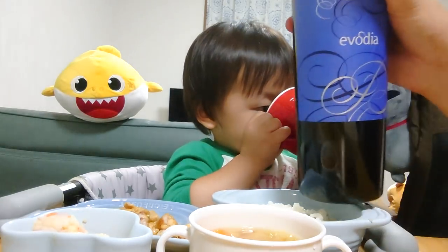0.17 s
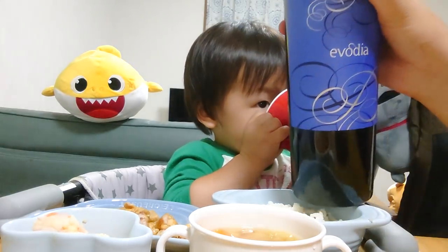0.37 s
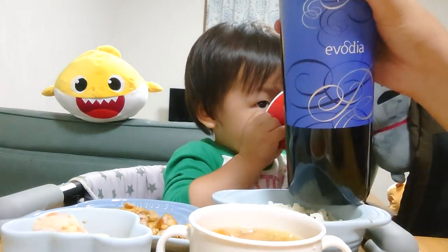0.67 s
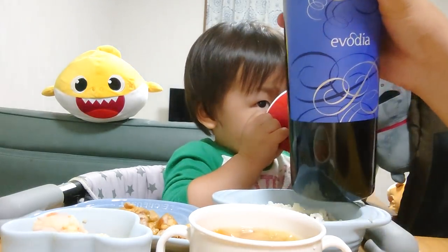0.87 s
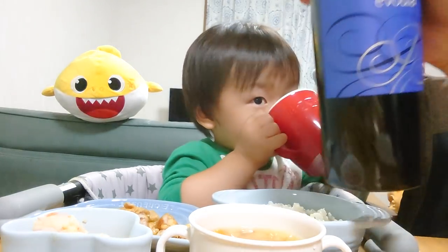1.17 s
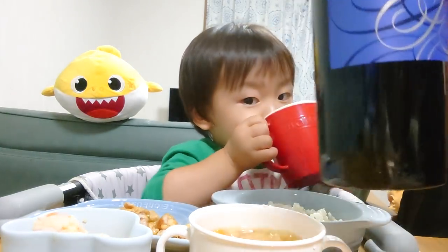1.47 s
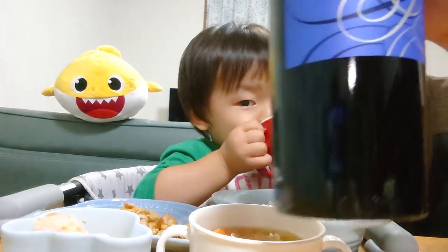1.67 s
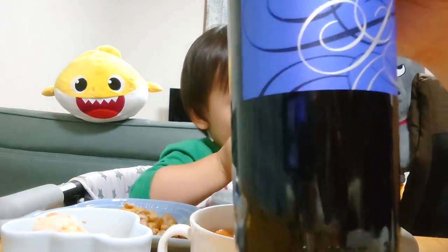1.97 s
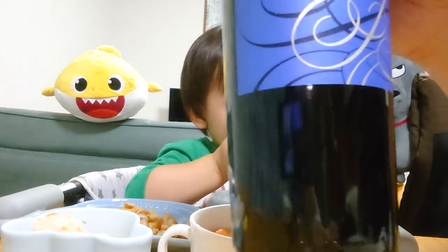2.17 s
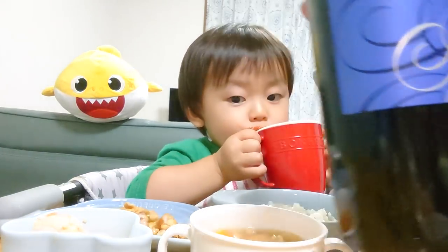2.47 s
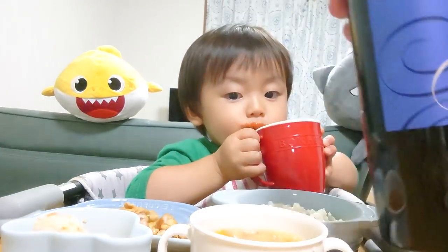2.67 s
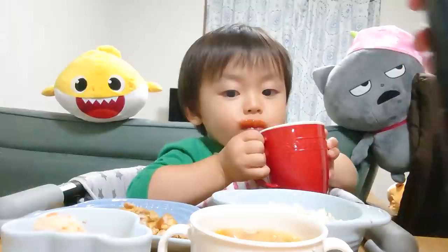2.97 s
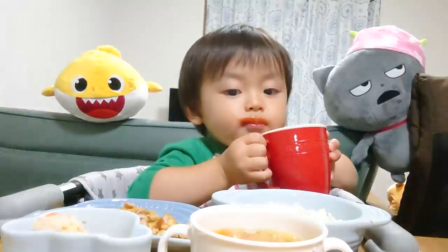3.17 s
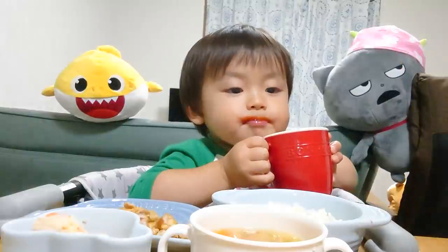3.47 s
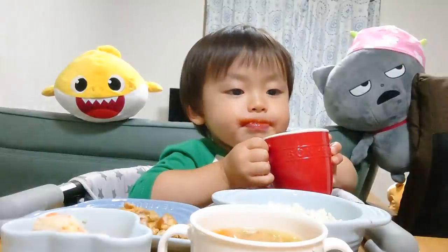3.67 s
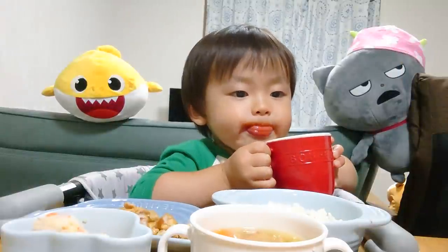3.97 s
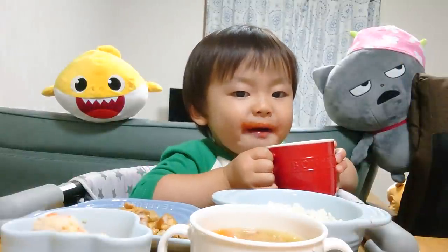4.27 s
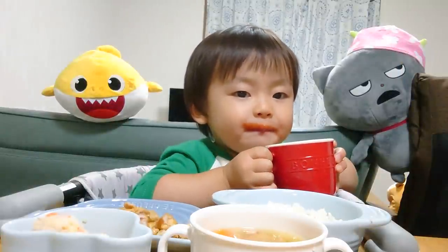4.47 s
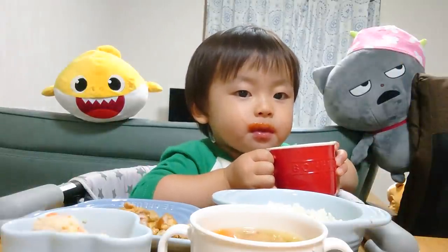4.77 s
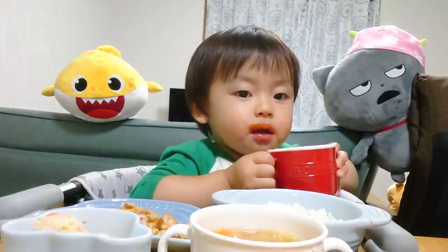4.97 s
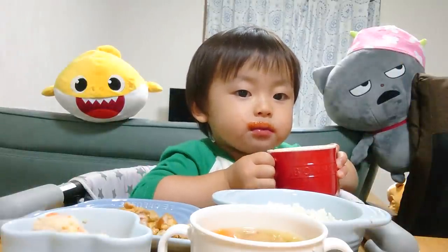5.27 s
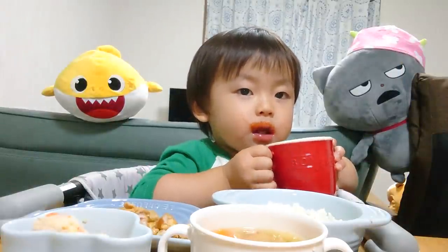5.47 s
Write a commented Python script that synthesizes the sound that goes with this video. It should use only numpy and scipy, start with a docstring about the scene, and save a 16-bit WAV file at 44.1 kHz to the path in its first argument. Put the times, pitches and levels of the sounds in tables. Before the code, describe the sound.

A quiet small dining room at home, heard through a close stereo microphone pair. A low steady hum with a very faint high whine lies to the left, and a thin airy hiss swells about every 0.4 seconds, weaker after 2.7. At 0.16 there is a soft low bump of handling. At 0.7 a glass bottle clacks against a dish, short and bright, just after a tiny creak. Between 1.35 and 1.6 come several faint squeaky creaks. At 2.12 the bottle lands with a woody knock, followed at 2.2 by a sharper, damped glassy one, with small rocking touches and a dull bump until about 2.45. Then mostly hum, a barely audible brush at 3.8 and faint dry ticks at 4.36 and 5.07. At 5.22 a heavy, loud knock shakes the table; dishes rattle briefly, with weaker rebounds to 5.32 and a last low bump at 5.45.

```python
"""A low room hum and a thin, swelling hiss are heard first, made of shaped noise and sines.
A glass bottle is moved about a laid table in a small room, close to a stereo pair of microphone ports.
It clacks against a dish and lands in two knocks; later a heavy knock makes the tableware rattle.
Struck objects are sums of decaying modes, brushing is a run of slips, and creaks are swelling sines."""
import sys
import numpy as np
from scipy import signal
from scipy.fft import rfft, irfft
from scipy.io import wavfile

SR = 44100
rng = np.random.default_rng(int(sys.argv[2]) if len(sys.argv) > 2 else 0)


def unload_audio(sound):
    """Save the sound as a 16-bit wav file, at the path given as the first command line argument."""
    columns = np.transpose(np.atleast_2d(sound))
    # keep every value between -1 and 1, then stretch to whole-number steps
    steps = np.round(np.clip(columns, -1, 1) * 32767)
    wavfile.write(sys.argv[1], SR, steps.astype(np.int16))


N = 247753
TIME = np.arange(N) / SR  # seconds

# Source levels are taken before the ports, the room and the final gains, unless stated otherwise.
# Spectrum of the room tone. Each row: frequency in Hz, relative density in dB per Hz.
ROOM_TONE = [(20, -34), (43, -6.5), (70, -14), (100, -12.5), (150, -2.5), (190, -9.5), (320, -11),
             (520, -16), (680, -15.5), (1150, -24), (2600, -28), (4700, -39.5), (5600, -65.5),
             (16000, -78.5)]
ROOM_TONE_DB = -56  # rms, before its split into diffuse and direct parts
# Steady appliance hum. Each row: frequency in Hz, level at the left port in dB rms.
HUM = [(97, -65), (151, -64), (333.8, -68.5), (429, -74.5), (667.5, -68), (1933, -73.5)]
# Faint wavering appliance whine. Each row: time in seconds, frequency in Hz, level at the left port in dB rms.
WHINE = [(0, 2547, -79), (3.0, 2570, -83), (4.0, 2604, -78.5), (4.8, 2588, -74), (5.62, 2600, -77)]
# Likeness of the two channels in diffuse sound. Each row: frequency in Hz, correlation from -1 to 1.
LIKENESS = [(60, 0.75), (130, 0.99), (290, 0.98), (640, -0.042), (1400, 0.051), (3100, -0.14),
            (15000, 0.092)]
# Steady hiss under the swells, sinking with time. Each row: time in seconds, level in dB.
HISS_BED = [(0, -79.5), (4.7, -82.5), (5.2, -88)]
# Swells of hiss. Each row: start in seconds, level in dB, level of the after-swell relative to it in dB.
HISS_SWELLS = [(0.085, -68.5, -2), (0.474, -60, -7), (0.827, -61.5, -12.5), (1.212, -60.5, -11.5),
               (1.57, -62, -11), (1.957, -64, -5.5), (2.303, -62.5, -14), (2.751, -70, -1),
               (3.225, -72, -12), (3.75, -75, -6), (4.27, -75, -5.5)]
# Spectrum of the hiss. Each row: frequency in Hz, relative density in dB per Hz.
HISS_COLOUR = [(1000, -4.5), (2000, -4), (4800, -1.5), (5500, -22.5), (6700, -15.5), (7600, -34.5),
               (10100, -11), (13000, -2.5), (14800, -5), (16000, -26)]
SWELL_ATTACK_S, SWELL_HOLD_S, SWELL_FALL_DB_PER_S = 0.013, 0.084, 108
AFTER_SWELL_S = 0.15  # delay of the after-swell

# Long modes of the table top. Each row: frequency in Hz, level in dB, t60 in seconds.
TABLE = [(87.5, -11, 0.51), (104, -9.5, 0.34), (137.3, -1.5, 0.35), (196, -10, 0.27), (178, 2, 0.04),
         (233, -8, 0.24), (261.5, -6.5, 0.22), (334.3, -10.5, 0.18), (387.4, -14.5, 0.18),
         (430.2, -4.5, 0.11), (473, -15, 0.28), (554.6, -8.5, 0.17), (614, -8, 0.1), (837, -23.5, 0.25),
         (903, -22, 0.15)]
# Short, dense upper modes of the top. Each row: frequency in Hz, level in dB, t60 in seconds.
BOARD = [(317, 1.5, 0.036), (516, -18.5, 0.11), (701, -5, 0.051), (837, 2, 0.027), (964, 7, 0.012),
         (1081, 3.5, 0.03), (1369, 3, 0.033), (1570, -2, 0.024), (1805, -2, 0.044), (2100, -12.5, 0.048),
         (2650, -8.5, 0.013), (3140, 0, 0.0029)]
# Soft bumps of handling. Each row: start in seconds, level in dB, pitch of the struck spot in Hz,
# cycles until it is 60 dB down, scuff level in dB.
BUMPS = [(0.158, -54.5, 46.6, 23, -66), (2.404, -45, 45.3, 6.9, -62.5), (5.448, -36, 142, 4.5, -88)]
# Uneven touches within a bump. Each row: delay in seconds, thud level in dB, clack level in dB,
# contact cut-off in Hz, spot level in dB; levels are relative to the bump.
BUMP_TOUCHES = [(0, -8.5, -11, 260, 13.5), (0.012, -4.5, -4.5, 330, 4.5), (0.021, -13, 0.5, 430, 5.5),
                (.035, -25, -12, 350, 2.5), (.1, -21, -18, 300, -2)]
SCUFF_S, SCUFF_BAND_HZ = 0.14, [140, 10000]
# Things brush and shift on the table. Each row: start in seconds, nominal length in seconds,
# lowest frequency in Hz, highest frequency in Hz, level in dB rms before the stroke's envelope.
RUSTLES = [(0.16, 0.083, 30, 197, -60.5), (2.398, 0.052, 2560, 4840, -64), (2.402, 0.02, 35, 395, -48.5),
           (2.2, 0.037, 88, 220, -47), (2.449, 0.096, 40, 297, -53), (2.748, 0.03, 2222, 4167, -65),
           (3.83, 0.037, 2037, 3900, -75)]
# Small creaks. Each row: start in seconds, swelling time in seconds, frequency in Hz, peak level in dB.
CREAKS = [(0.641, 0.0034, 1025, -41.5), (1.339, 0.0014, 910, -55), (1.356, .0012, 910, -52.5),
          (1.407, 0.0018, 1040, -59), (1.493, 0.0038, 950, -60), (1.516, .005, 946, -62),
          (1.538, .002, 940, -56), (1.548, 0.0025, 930, -55.5), (1.562, 0.003, 950, -51),
          (1.579, 0.004, 944, -54), (1.5976, .0014, 960, -47.5), (1.611, 0.0009, 940, -49.5)]
# The glass itself sounds. Each row: start in seconds, level in dB, freedom to ring from 0 to 1.
CLINKS = [(0.7134, -25, 0.52), (2.1999, -25.5, 0.07)]
# Modes of glass and dish. Each row: frequency in Hz, level in dB, t60 in seconds when quite free.
DISH = [(1123, -2.5, 0.088), (1320, -2.5, 0.044), (1560, 0.5, 0.053), (1610, -19, 0.15), (1840, -4.5, 0.05),
        (2083, -1.5, 0.091), (2150, -9.5, 0.042), (2253, -3.5, 0.1), (2330, -11.5, 0.09), (1430, -12, 0.08),
        (2450, -9.5, 0.055), (2805, -30, 0.34), (2820, -29, 0.33), (5030, -20, 0.12)]
# Hard blows on the table. Each row: start in seconds, thud level in dB, clack level in dB, contact cut-off in Hz,
# pitch of the struck spot in Hz, its level in dB, pitch at which the top flexes there in Hz, its level in dB,
# tick level in dB.
KNOCKS = [(0.7148, -37, -41, 2320, 852, -20, 137, -38.5, -44.5),
          (2.1222, -32, -21, 740, 208, -19.5, 130.4, -12.5, -31),
          (2.2004, -33, -33.5, 3300, 903, -14, 346, -22, -35),
          (5.2234, -22, -21.5, 820, 518, -9, 128, -22.5, -46.5),
          (5.2262, -36.5, -21.5, 1490, 245, -18.5, 192, -15.5, -47)]
# What was set down rocks and touches again. Each row: start in seconds, thud level in dB, clack level in dB,
# contact cut-off in Hz, pitch of the struck spot in Hz, its level in dB.
REBOUNDS = [(2.1443, -57, -40, 960, 880, -42), (2.174, -45, -56, 300, 89, -18.5),
            (2.199, -55, -52, 300, 110, -24.5), (2.2155, -56, -38, 900, 480, -33),
            (2.2504, -42, -44, 1300, 109, -28.5), (5.2621, -36.5, -33.5, 600, 244, -22),
            (5.2858, -35.5, -50.5, 406, 131, -21), (5.3244, -41, -42.5, 406, 134, -31.5)]
# Faint dry ticks. Each row: start in seconds, level in dB.
TICKS = [(4.3623, -59), (5.0675, -58)]
# Loose tableware chatters after a heavy blow. Each row: start in seconds, length in seconds, level in dB.
RATTLES = [(5.232, 0.017, -49.5), (5.259, 0.0052, -47), (5.279, 0.0062, -50), (5.282, .008, -49.5),
           (5.302, .018, -52.5)]
# Modes of the loose tableware. Each row: frequency in Hz, level in dB, t60 in seconds.
CROCKERY = [(1370, -4.5, 0.115), (1555, -2, 0.14), (1810, -2, 0.11), (1895, 3.5, 0.1), (1980, -3, 0.061),
            (2230, -3, 0.088), (2480, -4, 0.051), (2645, -8.5, 0.12), (2840, -10, 0.091),
            (3600, -19.5, 0.1), (3930, -9, 0.08), (4260, -21, 0.11), (4620, -14.5, 0.13), (12400, 4, 0.044)]

# Reverberation time of the room. Each row: frequency in Hz, t60 in seconds.
ROOM_T60 = [(80, 0.47), (250, 0.35), (700, 0.36), (2000, 0.31), (5000, 0.24), (14000, 0.52)]
# Strength of the room's echo. Each row: frequency in Hz, level in dB.
ROOM_ECHO = [(60, 1.5), (140, -9), (300, -5.5), (700, -13.5), (1500, -16), (4000, -5), (14000, -11)]
# Response of a microphone port, with a deep dip in the treble. Each row: frequency in Hz, gain in dB.
PORT = [(30, -10.5), (100, -1.5), (2500, 7), (4900, 0), (5600, -20), (6700, -11), (7800, -27),
        (10200, -9.5), (13000, -2), (16000, -12)]
# The right port hears each source this much later, in seconds.
TABLE_LAG_S, DISH_LAG_S, APPLIANCE_LAG_S = .00035, .00026, .00027
# Below these the table top radiates poorly and the room hardly rings.
RADIATE_HZ, ROOM_LOWEST_HZ = 50.6, 69.6
CUTOFF_HZ = 15900


def from_db(db):
    """Amplitude is the antilogarithm of a level."""
    return 10 ** (np.asarray(db) / 20)


def rms_one(x):
    """Normalization brings the effective value to one."""
    return x / np.sqrt(np.mean(x ** 2) + 1e-20)


def at_hz(points, hz):
    """Linear interpolation reads a spectrum on a log-frequency axis."""
    known_hz, values = np.transpose(points)
    return np.interp(np.log(np.maximum(hz, 1)), np.log(known_hz), values)


def butter(x, hz, kind, order=2):
    """A Butterworth filter passes its band with maximal flatness."""
    sos = signal.butter(order, hz, kind, fs=SR, output="sos")
    return signal.sosfilt(sos, x + 1e-18)


def add(out, s, sound):
    """Superposition mixes a sound in from time s on."""
    start = round(s * SR)
    out[..., start:start + sound.shape[-1]] += sound[..., :N - start]


def diffuse(colour, size):
    """In a diffuse field the two channels agree only in the bass."""
    hz = np.fft.rfftfreq(size, 1 / SR)
    mid, side = rfft(rng.standard_normal((2, size)))
    alike = np.clip(at_hz(LIKENESS, hz), -.99, .99)
    stereo = np.sqrt(1 + alike) * mid + np.sqrt(1 - alike) * side * [[1], [-1]]
    return irfft(stereo * from_db(at_hz(colour, hz)), size)


def from_left(x, lag_s, shade_db=-5.0, shade_hz=300, bass_db=-1):
    """Path difference delays the right port's signal, and shadowing weakens it above the bass."""
    late = np.interp(TIME - lag_s, TIME, x[1])
    bass = butter(late, shade_hz, "low", order=1)
    right = from_db(bass_db) * bass + from_db(shade_db) * (late - bass)
    return np.array([x[0], right])


def background(whine_waver_hz=1.1, waver_rate_hz=6, direct_share=0.26, pan_db=0.0):
    """Diffuse room tone adds to direct sound from an appliance on the left: noise, hum and a wavering whine."""
    hum = sum(from_db(db) * np.sqrt(2) * np.sin(2 * np.pi * (hz * TIME + rng.random())) for hz, db in HUM)

    whine_s, whine_hz, whine_db = np.transpose(WHINE)
    waver = rms_one(butter(rng.standard_normal(N), waver_rate_hz, "low"))
    pitch = np.interp(TIME, whine_s, whine_hz) + whine_waver_hz * waver
    phase = 2 * np.pi * np.cumsum(pitch) / SR
    whine = from_db(np.interp(TIME, whine_s, whine_db)) * np.sqrt(2) * np.sin(phase)

    share = np.clip(direct_share, 0, 1)  # of the room tone's power
    around, straight = (from_db(ROOM_TONE_DB) * rms_one(diffuse(ROOM_TONE, size=N)) for _ in range(2))
    appliance = np.tile(np.sqrt(share) * straight[0] + hum + whine, (2, 1))
    ambient = np.sqrt(1 - share) * around * from_db([[pan_db], [-pan_db]])
    return ambient + from_left(appliance, APPLIANCE_LAG_S, shade_db=-7.5)


def swell(s):
    """An envelope of attack, hold and exponential release starts at time s."""
    age = np.maximum(TIME - s, 0)
    fall_db = SWELL_FALL_DB_PER_S * np.maximum(age - SWELL_ATTACK_S - SWELL_HOLD_S, 0)
    return np.sqrt(np.minimum(age / SWELL_ATTACK_S, 1)) * from_db(-fall_db)


def hiss(hiss_pan_db=0.6):
    """Powers of incoherent noise add: a sinking bed, swells and their after-swells."""
    power = from_db(np.interp(TIME, *np.transpose(HISS_BED))) ** 2
    for s, db, after_db in HISS_SWELLS:
        power += (from_db(db) * swell(s)) ** 2
        power += (from_db(db + after_db) * swell(s + AFTER_SWELL_S)) ** 2
    noise = rms_one(diffuse(HISS_COLOUR, size=N))
    return np.sqrt(power) * noise * from_db([[hiss_pan_db], [-hiss_pan_db]])


def ring(hz, t60):
    """A damped mode is an exponentially dying sine, here one second of it."""
    t = TIME[:SR]
    return np.sin(2 * np.pi * hz * t) * from_db(-60 * t / t60)


def spot_ring(hz, db, cycles=13):
    """Local resonance: the struck spot falls 60 dB in a given number of cycles."""
    return from_db(db) * ring(hz, cycles / hz)


def struck(modes, spread_db, detune=0):
    """Modal superposition: a blow excites each mode by its own amount, detuned by the shifting load."""
    signs = np.resize([1, -1, 1], len(modes))  # one mode in three starts the other way
    total = 0
    for sign, (hz, db, t60) in zip(signs, modes):
        level = from_db(db + spread_db * rng.standard_normal())
        total = total + sign * level * ring(hz * (1 + detune * rng.uniform(-1.12, 1)), t60)
    return total


def crack(t60):
    """At high modal density a burst becomes decaying noise, different at each port."""
    return rng.standard_normal((2, SR)) * from_db(-60 * TIME[:SR] / t60)


def blow(thud_db, clack_db, contact_hz, spot=0, crack_db=-6, crack_t60=0.13):
    """Contact stiffness limits bandwidth: a harder blow on the top drives its upper modes further."""
    low = struck(TABLE, spread_db=1.5, detune=.004)
    upper = struck(BOARD, spread_db=2.5, detune=.04)
    clack = from_db(clack_db) * (upper + from_db(crack_db) * crack(crack_t60))
    return -butter(from_db(thud_db) * low + clack + spot, contact_hz, "low")


def bumps():
    """Soft contacts in quick succession excite the bass; friction adds a brief scuff."""
    out = np.zeros((2, N))
    for s, db, spot_hz, cycles, scuff_db in BUMPS:
        for delay_s, thud_db, clack_db, contact_hz, spot_db in BUMP_TOUCHES:
            touch = blow(thud_db, clack_db, contact_hz, spot_ring(spot_hz, spot_db, cycles))
            add(out, s + delay_s, from_db(db) * touch)
        friction = rms_one(butter(rng.standard_normal(SR), SCUFF_BAND_HZ, "band", order=1))
        add(out, s, from_db(scuff_db) * friction * np.maximum(1 - TIME[:SR] / SCUFF_S, 0))
    return out


def rustles(slips_per_s=500, size_spread_db=4):
    """Sliding friction is a random run of tiny uneven impulses that rises fast and fades."""
    out = np.zeros((2, N))
    for s, length, low_hz, high_hz, db in RUSTLES:
        happens = rng.random(SR) < slips_per_s / SR
        slips = happens * rng.choice([-1, 1], SR) * from_db(size_spread_db * rng.standard_normal(SR))
        stroke = np.interp(TIME[:SR] / length, [0, .1, .5, 1.5], [0, 1, 1, 0])
        add(out, s, from_db(db) * stroke * rms_one(butter(slips, [low_hz, high_hz], "band")))
    return out


def creaks():
    """Stick-slip: a rubbing contact gives separate ringing pulses that swell and die at once."""
    out, t = np.zeros(N), TIME[:SR]
    for s, rise_s, hz, db in CREAKS:
        envelope = t / rise_s * np.exp(1 - t / rise_s)  # peaks at one
        add(out, s, from_db(db) * envelope * np.sin(2 * np.pi * hz * t))
    return out


def clinks():
    """Contact damping: the firmer the glass is pressed to dish or table, the sooner its modes die."""
    out = np.zeros(N)
    for s, db, freedom in CLINKS:
        modes = [(hz, level_db, t60 * freedom) for hz, level_db, t60 in DISH]
        clink = struck(modes, spread_db=1)
        add(out, s, -from_db(db) * butter(clink, [300, 4000], "band"))
    return out


def knocks(tick_t60=0.014, clatter_db=-17, clatter_t60=0.11, flex_cycles=15):
    """Impact excitation: a hard blow ticks, clatters, flexes the top locally and shakes all of it."""
    out = np.zeros((2, N))
    for s, thud_db, clack_db, contact_hz, spot_hz, spot_db, flex_hz, flex_db, tick_db in KNOCKS:
        clatter = from_db(clatter_db) * butter(crack(clatter_t60), 4000, "low")
        tick = from_db(tick_db) * (crack(tick_t60) + clatter)
        local = spot_ring(spot_hz, spot_db) + spot_ring(flex_hz, flex_db, flex_cycles)
        add(out, s, tick + blow(thud_db, clack_db, contact_hz, local))
    return butter(out, RADIATE_HZ, "high", order=1)


def rebounds(cycles=8):
    """Rocking spends energy in further touches, weaker than the main blows."""
    out = np.zeros((2, N))
    for s, thud_db, clack_db, contact_hz, spot_hz, spot_db in REBOUNDS:
        add(out, s, blow(thud_db, clack_db, contact_hz, spot_ring(spot_hz, spot_db, cycles)))
    return butter(out, RADIATE_HZ, "high")


def ticks(t60=0.012, lowest_hz=3000):
    """Brief contacts radiate only treble, too light to shake the table."""
    out = np.zeros((2, N))
    for s, db in TICKS:
        add(out, s, from_db(db) * butter(crack(t60), lowest_hz, "high"))
    return out


def rattles(ring_db=-10, scatter_db=0, scatter_t60=0.088, count=2):
    """Repeated impact: dishes and cutlery hop on the shaking top in quick uneven touches."""
    out = np.zeros((2, N))
    for s, length, db in RATTLES:
        for place in (np.arange(count) + rng.random(count)) / count:
            ringing = from_db(ring_db) * struck(CROCKERY, spread_db=5.0, detune=0.014)
            touch = ringing + from_db(scatter_db) * crack(scatter_t60)
            add(out, s + place * length, from_db(db) * touch)
    return out


def room(x, first_echo_s=0.0035):
    """Reverberation is convolution with dense noise that decays at its own rate in each octave."""
    t, hz = TIME[:SR], np.fft.rfftfreq(SR, 1 / SR)
    noise, echo = rfft(diffuse(ROOM_ECHO, size=SR)), 0
    for centre in 31.25 * 2 ** np.arange(10):
        share = np.maximum(0, 1 - abs(np.log2(np.maximum(hz, 1) / centre)))
        onset = np.clip(t / first_echo_s - 1, 0, 1)
        fade = from_db(-60 * t / max(at_hz(ROOM_T60, centre), .15)) * onset
        echo = echo + irfft(noise * share, SR) * fade / np.sqrt(2 * np.sum(fade ** 2))
    return signal.fftconvolve(x.mean(axis=0)[None], echo, axes=1)[:, :N]


def port(x, size=2048):
    """Folding the cepstrum turns the port's magnitude response into a causal, minimum-phase filter."""
    cepstrum = irfft(np.log(from_db(at_hz(PORT, np.fft.rfftfreq(size, 1 / SR)))))
    folded = np.r_[cepstrum[0], 2 * cepstrum[1:size // 2]]
    impulse = irfft(np.exp(rfft(folded, size)))
    return signal.fftconvolve(x, impulse[None], axes=1)[:, :N]


def scene(direct_db=2, hiss_db=1):
    """Superposition of direct sound and reverberation through the ports, over background and hiss."""
    table = bumps() + rustles() + knocks() + rebounds() + ticks()
    dish = np.tile(creaks() + clinks(), (2, 1))
    loose = rattles()
    direct = from_left(table, TABLE_LAG_S) + from_left(dish, DISH_LAG_S)
    direct = direct + from_left(loose, TABLE_LAG_S, shade_db=-22.5, shade_hz=4000)
    reverberant = room(butter(table + dish + loose, ROOM_LOWEST_HZ, "high"))
    tableware = port(from_db(direct_db) * direct + reverberant)
    return tableware + background() + from_db(hiss_db) * hiss()


def record(dry):
    """An elliptic low-pass cuts the top of the spectrum steeply."""
    sos = signal.ellip(10, .1, 70, CUTOFF_HZ, fs=SR, output="sos")
    return signal.sosfilt(sos, dry)


dry = scene()
out = record(dry)
unload_audio(out)
```